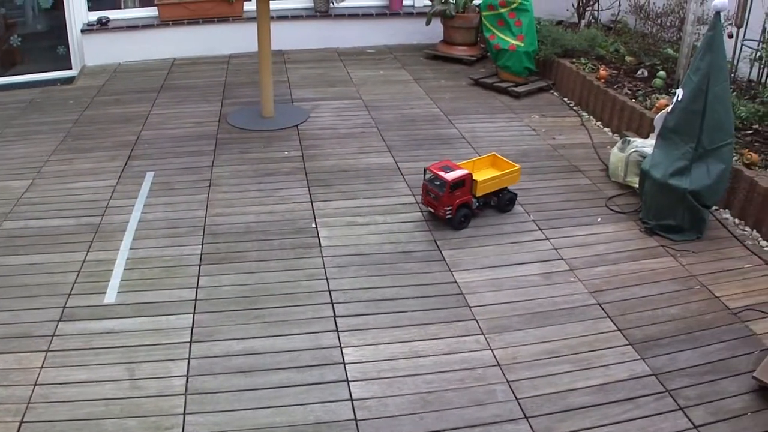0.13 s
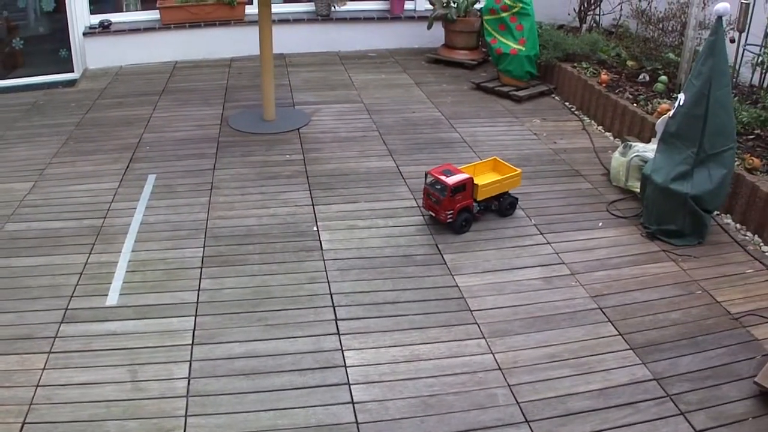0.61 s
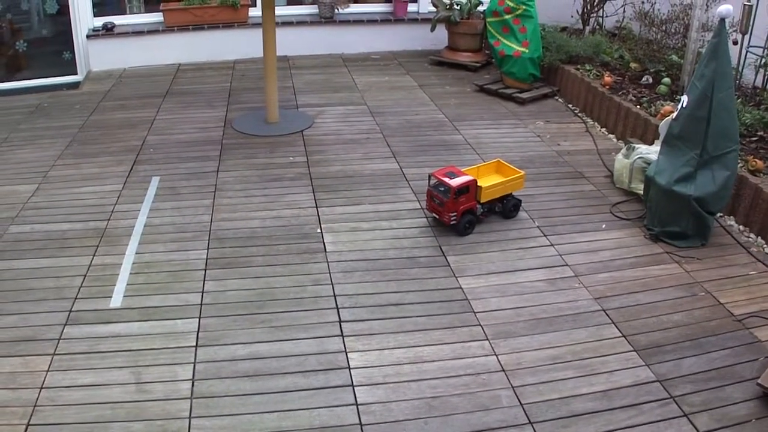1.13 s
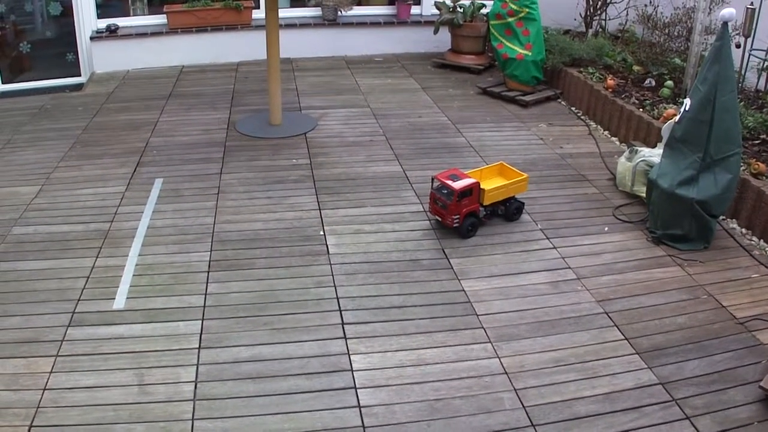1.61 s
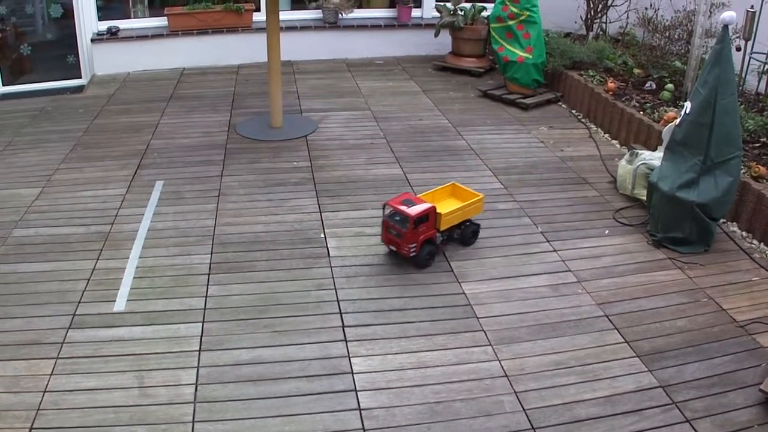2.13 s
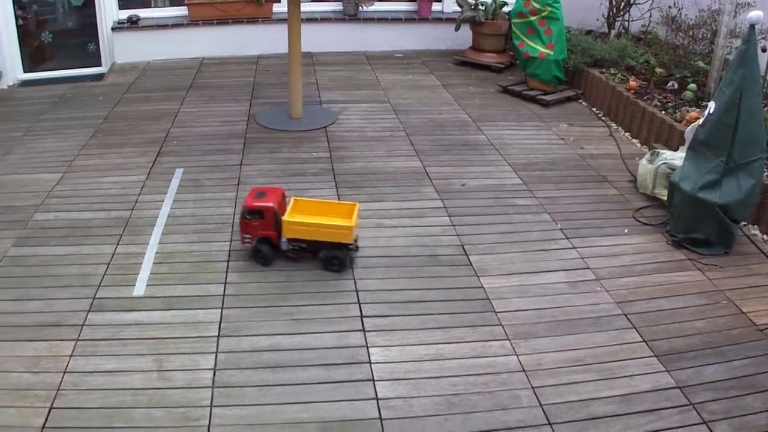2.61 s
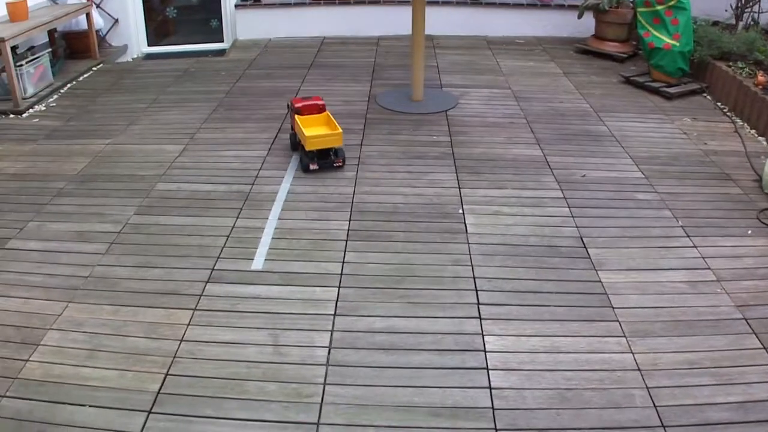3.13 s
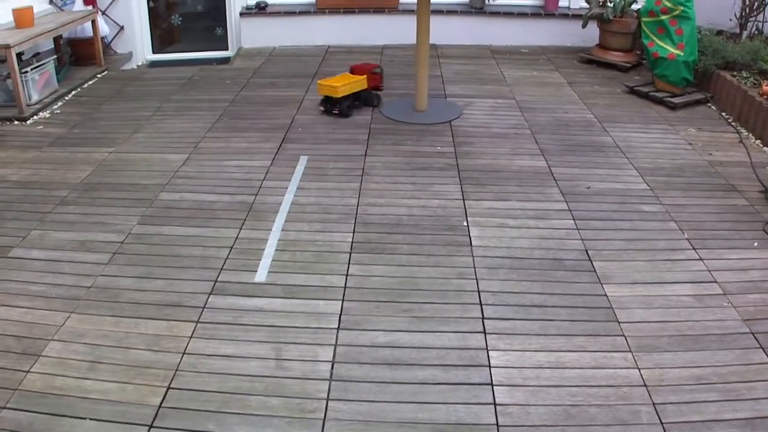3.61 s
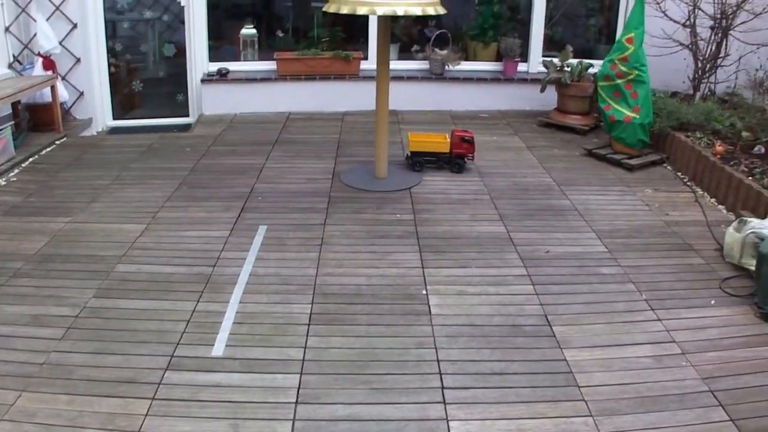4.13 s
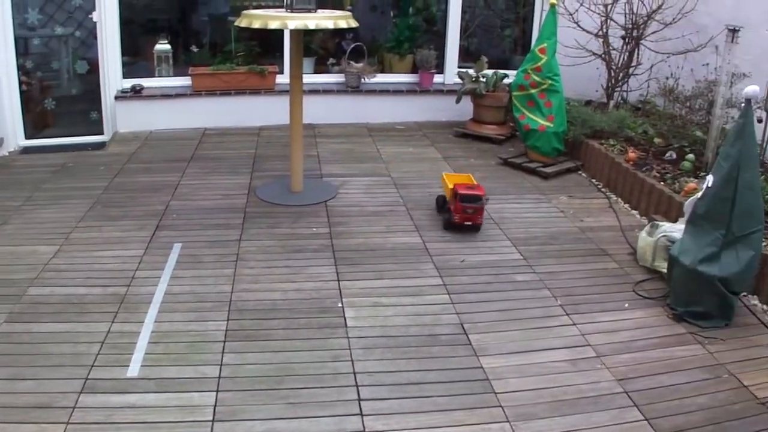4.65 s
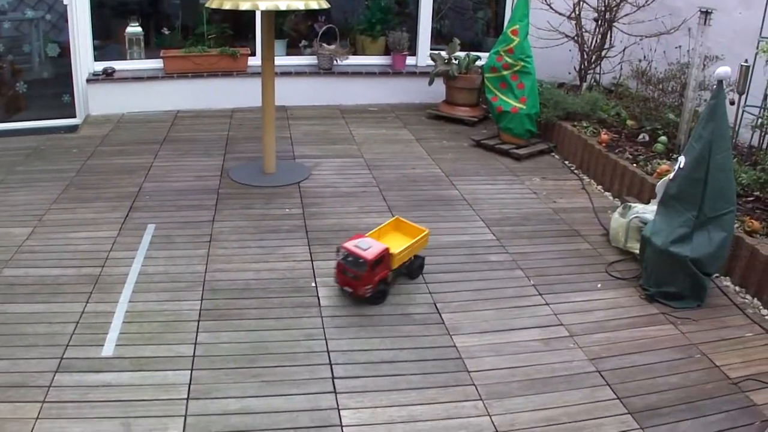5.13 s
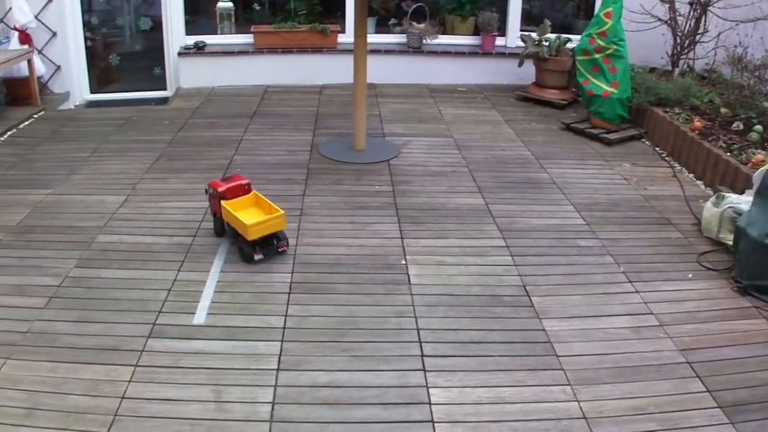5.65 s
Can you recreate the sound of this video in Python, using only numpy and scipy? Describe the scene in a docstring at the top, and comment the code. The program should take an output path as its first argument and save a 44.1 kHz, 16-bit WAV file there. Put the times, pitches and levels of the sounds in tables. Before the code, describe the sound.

Nearly two seconds of soft far hum and faint high whine, broken by a tiny plastic tick. A toy truck then drives over wooden tiles: uneven gear whirs surge and drop, wheels rattle and crackle, the hollow plastic body knocks. There is a brief lull around four seconds, then the strongest whine and clatter until the end. Outdoors between close walls, short reflections, heard through a small, coloured camera microphone.

```python
"""A town hums far off behind thin electronic tones; a toy truck stands on wooden deck tiles, its steering clicks.
Then it drives in bursts of throttle: gear whine is summed from smeared tones at the tooth rates,
grind and tyre hiss from dense tiny impacts, cracks from short noise bursts, knocks from decaying tones and noise.
Walls add a short echo, and a small camera colours everything, with deep notches in its treble."""
import sys
import numpy as np
from scipy import signal
from scipy.fft import rfft, irfft, next_fast_len
from scipy.io import wavfile
from scipy.ndimage import uniform_filter1d, map_coordinates

SR = 44100
rng = np.random.default_rng(int(sys.argv[2]) if len(sys.argv) > 2 else 0)


def elevation(decibels):
    """Turn decibel levels (scalar or array-like) into linear amplitude ratios."""
    levels = np.asarray(decibels, float)
    return 10 ** (levels / 20)


def unload_audio(sound):
    """Save the sound as a 16-bit wav file, at the path given as the first command line argument."""
    columns = np.transpose(np.atleast_2d(sound))
    # keep every value between -1 and 1, then stretch to whole-number steps
    steps = np.round(np.clip(columns, -1, 1) * 32767)
    wavfile.write(sys.argv[1], SR, steps.astype(np.int16))


N = 254016
START_S = 1.74  # the truck sets off
RELEASE_S = 0.035  # fade after a burst of throttle or a whine


def unit(x):
    """Scales a signal to an rms of one."""
    return x / np.sqrt(np.mean(x ** 2) + 1e-20)


def along(points, hz):
    """Interpolates (Hz, value) points on a log frequency axis."""
    f, v = np.transpose(points)
    return np.interp(np.log(hz + 1), np.log(f + 1), v)


def curves(rows):
    """One value per sample for each column after the time."""
    s, *cols = np.transpose(rows)
    return [np.interp(np.arange(N) / SR, s, c) for c in cols]


def wobble(rate):
    """A smooth random curve, rate knots a second."""
    knots = rng.standard_normal(int(N * rate / SR) + 4)
    return map_coordinates(knots, [np.arange(N) * rate / SR])


def filtered(x, response):
    """Multiplies the spectrum of x by a response of frequency."""
    n = x.shape[-1]
    m = 2 * next_fast_len(n // 2 + SR // 8)
    return irfft(rfft(x, m) * response(np.fft.rfftfreq(m, 1 / SR)), m)[..., :n]


def causal(gain):
    """The minimum-phase response with this gain: it rings after an impact, not before it."""
    cepstrum = irfft(np.log(gain + 1e-6))
    cepstrum[1:len(cepstrum) // 2] *= 2
    cepstrum[len(cepstrum) // 2 + 1:] = 0
    return np.exp(rfft(cepstrum))


# Colour of the tyre hiss and cracks. Each row: frequency in Hz, relative level in dB.
TYRE_SPECTRUM = [(1500, -57), (2800, -16.5), (4000, -15.5), (6000, -4.5), (9000, -6), (16000, -2.5)]
# Colour of the thin upper shell. Each row: frequency in Hz, relative level in dB.
SHELL_SPECTRUM = [(500, -27), (1500, 0), (2000, 5), (2400, -0.5), (2900, -5.5), (4500, -3), (7000, -23)]
# Colour of the rumbling deck. Each row: frequency in Hz, relative level in dB.
DECK_SPECTRUM = [(40, -63), (100, -45), (150, -12), (200, -4.5), (300, 9), (400, -5), (600, -25.5)]


def grind():
    """Uneven tooth and tread contacts shake the body and the deck; the tyres hiss in lumps."""
    def coloured(x, spectrum):
        return unit(filtered(x, lambda hz: causal(elevation(along(spectrum, hz)))))

    grind_db = effort()
    tyre_db, = curves(ROLLING)
    unevenness = 1.23 * wobble(45)  # in dB: random quick unevenness of the grind

    teeth = elevation(unevenness) * contacts(rate=4000, spread_db=2.0)
    shake = unit(patchy(filtered(teeth, body), depth_db=2.7, size=2))
    shell_hits = elevation(unevenness + 0.3 * wobble(30)) * contacts(rate=7600, spread_db=3.0)
    shell = coloured(shell_hits, SHELL_SPECTRUM)
    grit = elevation(0.79 * unevenness + 0.37 * wobble(74)) * contacts(rate=15000, spread_db=2.0)
    hiss = coloured(patchy(grit, depth_db=2.2, size=4), TYRE_SPECTRUM)
    deck = coloured(elevation(0.13 * unevenness) * rng.standard_normal(N), DECK_SPECTRUM)

    slow_db = uniform_filter1d(grind_db, SR // 5)  # the heavy deck responds slowly
    mix = driving(grind_db - 3.5) * shake
    mix += driving(grind_db - 14.0) * shell
    mix += driving(tyre_db + 9.5) * hiss
    mix += driving(0.73 * slow_db - 32.5) * deck
    return mix


# Rolling, louder with speed and nearness. Each row: time in seconds, relative level in dB.
ROLLING = [(1.72, -69), (1.82, -56.5), (1.96, -57), (2.14, -51), (2.22, -48), (2.36, -45), (2.6, -46.5),
           (2.84, -43), (3.14, -47), (3.55, -40.5), (3.72, -40.5), (3.9, -50), (4.36, -41.5), (4.74, -47),
           (5.1, -43.5), (5.25, -37.5), (5.76, -38.5)]
# Bursts of throttle. Each row: start in seconds, length before release in seconds, relative grind in dB.
THROTTLE_BURSTS = [(1.773, 0.077, -37), (2.127, .06, -40.5), (2.245, 0.034, -40), (2.33, 0.15, -32),
                   (2.611, .26, -29.5), (2.957, 0.12, -37.5), (3.108, 0.25, -31.5), (3.47, 0.25, -31),
                   (4.165, .13, -36), (4.309, 0.0533, -74), (4.398, 0.073, -29.5), (4.766, 0.32, -32.5),
                   (5.175, 0.25, -31.5), (5.34, 0.32, -31)]


def effort():
    """Relative grind level in dB: freewheeling, plus the power of each burst's attack, hold and release."""
    attack_s, coast_db = 0.038, 12  # coast_db: freewheeling grind over the rolling level
    t = np.arange(N) / SR
    roll_db, = curves(ROLLING)
    power = elevation(roll_db + coast_db) ** 2
    for start, length, db in THROTTLE_BURSTS:
        rise = (t - start) / attack_s
        fall = 1 + (start + length - t) / RELEASE_S
        power = power + (elevation(db) * np.clip(np.minimum(rise, fall), 0, 1)) ** 2
    return 10 * np.log10(power)


def driving(level_db):
    """Gain of a level curve, silent before the truck sets off."""
    return elevation(level_db) * np.clip((np.arange(N) / SR - START_S) / 0.03, 0, 1)


def contacts(rate, spread_db):
    """Dense tiny impacts of uneven size and random sign, about rate a second."""
    hit, size, sign = rng.random((3, N))
    impacts = (hit < rate / SR) * elevation(-spread_db * np.log(size + 1e-4))
    return unit(impacts * np.sign(sign - .5))


def patchy(x, depth_db, size):
    """Random gain in small patches of time and pitch: the sound is uneven and blotchy."""
    z = signal.stft(x, nperseg=512)[2]
    field = uniform_filter1d(rng.standard_normal(z.shape), size, 0)  # size in frequency bins
    field = uniform_filter1d(field, 4, 1)
    return signal.istft(z * elevation(depth_db * unit(field)), nperseg=512)[1][:N]


# Body resonances. Each row: centre in Hz, width in Hz, relative level in dB.
BODY_MODES = [(308, 57, -15.5), (624, 184, 0.5), (1130, 370, 0.5), (1460, 353, 3.5), (1736, 340, 2.5),
              (2435, 840, -7.5)]


def body(f):
    """Response of the plastic body: resonances of alternate sign, too small a shell to radiate bass."""
    modes = 0
    for k, (centre, width, db) in enumerate(BODY_MODES):
        damping = 1j * f * width
        modes = modes + (-1) ** k * elevation(db) * damping / (centre * centre - f * f + damping)
    return modes * (1j * f / (1j * f + 170)) ** 3


# Gear pairs sounding with the motor. Each row: ratio to the tooth rate, relative level in dB.
GEAR_PAIRS = [(1, 2), (0.81, -16.5), (1.4, -19), (1.9, -9.5), (2.02, -10.5)]
# The motor gears' glides, before sway. Each row: start in seconds, length before release in seconds,
# first tooth rate in Hz, last tooth rate in Hz, relative level in dB.
MOTOR_GLIDES = [(1.851, .35, 1460, 1410, -52.5), (2.12, 0.14, 685, 736, -49.5),
                (2.344, 0.13, 1060, 1032, -42.5), (2.627, 0.23, 1049, 1248, -35.5),
                (3.111, 0.21, 1010, 1260, -39.5), (3.461, 0.22, 1384, 1433, -35.5),
                (4.149, .22, 978, 1470, -43), (4.389, 0.086, 1340, 1510, -38),
                (4.802, 0.12, 959, 1199, -41.5), (4.921, .12, 1281, 1453, -34.5),
                (5.179, .13, 1357, 1760, -34.5), (5.384, 0.32, 1621, 1751, -37.5)]
# The output gear pair's own glides, before sway. Each row: start in seconds, length before release
# in seconds, first tooth rate in Hz, last tooth rate in Hz, relative level in dB.
OUTPUT_GLIDES = [(3.11, 0.22, 2060, 2540, -47.5), (4.2, 0.2, 1780, 2020, -40.5),
                 (4.83, .2, 2210, 2520, -42)]


def whine():
    """Under throttle the gears sing at their tooth rates; play in the teeth smears and sways the lines."""
    sway = 1 + .022 * wobble(45)
    motor = sum(sing(glide(*row), GEAR_PAIRS, sway, steady=1.0) for row in MOTOR_GLIDES)
    output = sum(sing(glide(*row), [(1, 0)], sway, steady=0.95) for row in OUTPUT_GLIDES)
    return motor + output


def glide(s, length, first_hz, last_hz, db):
    """(s, Hz, dB) corners of one whine: it fades in, glides and swells, and fades out."""
    swell_db, edge_db, spin_up_s = 1, 10.5, .04
    return [(s, first_hz, db - edge_db),
            (s + spin_up_s, first_hz, db - swell_db),
            (s + length, last_hz, db + swell_db),
            (s + length + RELEASE_S, last_hz, db - edge_db)]


def sing(rows, meshes, sway, steady):
    """One glide: each gear pair is a tone at its ratio of the tooth rate, smeared by random modulation."""
    hz, db = curves(rows)
    t = np.arange(N) / SR
    on = np.clip(np.minimum(t - rows[0][0], rows[-1][0] + 0.0057 - t) / 0.015, 0, 1)
    span = on > 0
    phase = 2 * np.pi * np.cumsum((hz * sway)[span]) / SR
    line = np.zeros(N)
    for ratio, mesh_db in meshes:
        knots = rng.standard_normal((2, 200))
        position = np.arange(len(phase)) * 190 * np.sqrt(ratio) / SR  # higher lines smear faster
        a, b = (map_coordinates(k, [position]) for k in knots)
        tone = (steady + a) * np.cos(ratio * phase) + b * np.sin(ratio * phase)
        line[span] += elevation(db[span] + mesh_db) * on[span] * tone
    return line


# Sharp ticks of the steering linkage and axles. Each row: time in seconds, strength in dB.
LINKAGE_TICKS = [(1.2045, -14), (1.239, -34), (1.2454, -33), (1.7643, -18), (2.34, -14), (2.8894, -12),
                 (2.9453, -12), (3.0745, -21), (3.38, -14), (3.468, -14), (4.143, -19), (4.934, -18),
                 (5.155, -18)]
# The body knocks as the drive takes up slack or a wheel drops. Each row: time in seconds,
# strength in dB, pitch in Hz, ringing share from 0 to 1.
BODY_KNOCKS = [(1.2048, -23, 1520, 0.32), (1.2057, -24.5, 322, 0.67), (1.79, -28.5, 1450, 0.3),
               (1.806, -27, 756, 0.62), (1.839, -28, 1620, 0.8), (2.105, -27, 580, 0.8),
               (2.156, -19, 716, 0.66), (2.34, -23, 1800, 0.66), (2.465, -19.5, 1065, 0.85),
               (2.659, -11.5, 1140, 0.5), (2.731, -12, 1130, 1), (2.905, -18, 873, 0.6),
               (2.981, -21, 1686, 1), (3.138, -21, 1050, 0.4), (3.169, -17.5, 1120, 0.97),
               (3.227, -14, 1260, 0.53), (3.475, -17, 1430, 0.9), (4.142, -24.5, 750, 0.25),
               (4.24, -19.5, 1820, 1), (4.349, -13, 2090, 0.7), (4.535, -18.5, 640, 0.32),
               (4.801, -21, 1400, 0.2), (4.982, -13, 1420, 0.6), (5.009, -8, 1400, 0.88),
               (5.031, -11, 1460, 0.98), (5.195, -13.5, 1350, 0.75), (5.218, -12.5, 1310, 0.9),
               (5.239, -8.5, 1654, 1), (5.259, -11.5, 1764, 0.88), (5.278, -11, 1813, 0.7),
               (5.32, -15, 1550, 0.9), (5.385, -13, 1095, 0.6), (5.453, -14, 1625, 0.56),
               (5.499, -9.5, 1146, 0.96), (5.554, -14, 1925, 1), (5.565, -12.5, 1640, 0.94),
               (5.694, -11, 1480, 0.9)]


def clicks():
    """Bright cracks that also shake the body, and duller knocks that ring briefly at their own pitch."""
    def burst(db, decay_s, rise_s):  # decay_s: time to fall 60 dB
        return elevation(db - 60 * t / decay_s) * (1 - np.exp(-t / rise_s))

    t = np.arange(SR // 8) / SR
    lumps, knock = np.zeros(N + SR), np.zeros(N + SR)
    for s, db in rattle():
        lumps[round(s * SR):][:len(t)] += burst(db + 12, 0.031, 0.003)
    for s, db in LINKAGE_TICKS:
        lumps[round(s * SR):][:len(t)] += burst(db, 0.011, 0.00035)
    for s, db, hz, share in BODY_KNOCKS:
        share = np.clip(share, 0, 1)
        thud = unit(filtered(rng.standard_normal(len(t)), body))
        jitter = np.cumsum(rng.normal(0, 0.02, len(t)))
        ring = np.sin(2 * np.pi * hz * t + jitter)
        knock[round(s * SR):][:len(t)] += burst(db, 0.039, 0.0026) * (share * ring + (1 - share) * thud)
    crack, shake = lumps[:N] * rng.standard_normal((2, N))
    crack = patchy(crack, depth_db=3.0, size=7)
    crack = filtered(crack, lambda hz: causal(elevation(along(TYRE_SPECTRUM, hz))))
    knock = filtered(knock[:N], lambda f: (1j * f / (1j * f + 140)) ** 4)  # trims the bass
    return crack + elevation(-2.0) * filtered(shake, body) + knock


# Single cracks, faint to loud, of tread, grit and plastic. Each row: time in seconds, relative level in dB.
SINGLE_CRACKS = [(1.8387, -34), (2.0308, -52), (2.1904, -29.5), (2.2398, -27), (2.2693, -27.5),
                 (2.355, -22), (2.37, -22.5), (2.5107, -23), (2.54, -33), (2.6554, -21.5), (2.7906, -31),
                 (2.806, -25), (2.818, -22), (2.846, -20), (2.855, -31), (2.8885, -32), (2.904, -28),
                 (2.9427, -27.5), (2.993, -30), (3.0385, -27.5), (3.0739, -38), (3.1099, -24.5),
                 (3.347, -27), (3.379, -41), (3.4012, -32), (3.4456, -44), (3.5284, -20.5), (3.6277, -20),
                 (3.6717, -22), (3.695, -21), (3.7458, -29), (3.833, -30), (3.906, -29.5), (4.0975, -27),
                 (4.4104, -22.5), (4.5341, -39)]
# Wheels crossing the slats square on, a steady rattle. Each row: start in seconds, end in seconds,
# gap between cracks in seconds.
SLAT_RUNS = [(3.233, 3.32, .0262), (4.958, 5.115, .0249), (5.219, 5.35, .0202), (5.363, 5.7, .022)]


def rattle():
    """(s, relative dB) of every crack: the single ones, the evenly spaced slat runs and random grit."""
    slat_db, slat_spread_db = 17.5, 1.5  # over the rolling level
    grit_per_s, grit_db, grit_spread_db = 40, 10, 5  # over the rolling level, spread either way
    rows = list(SINGLE_CRACKS)
    for start, end, gap in SLAT_RUNS:
        times = start + gap * np.arange(20)
        db = np.interp(start, *np.transpose(ROLLING)) + slat_db
        levels = db + slat_spread_db * rng.standard_normal(20)
        rows += [beat for beat in zip(times, levels) if beat[0] < end]
    wait, size = rng.random((2, 300))
    when = START_S - np.cumsum(np.log(1 - wait)) / grit_per_s
    level = np.interp(when, *np.transpose(ROLLING)) + grit_db + grit_spread_db * (2 * size - 1)
    return rows + [row for row in zip(when, level) if row[0] < N / SR]


# Decay of the echo. Each row: frequency in Hz, time to fall 60 dB in seconds.
ECHO_DECAY = [(200, 0.2), (2000, 0.3), (10000, 0.3)]


def patio(x):
    """Walls answer with a decaying stereo noise tail; each frequency dies at its own speed."""
    hz, t, z = signal.stft(rng.standard_normal((2, SR // 3)), SR, nperseg=256)
    decay = elevation(-60 * t / along(ECHO_DECAY, hz)[:, None])
    tail = signal.istft(z * decay, SR, nperseg=256)[1]
    late = np.pad(x, (300, 0))[None]  # 300 samples, about 7 ms
    return signal.fftconvolve(late, tail / np.linalg.norm(tail[0]), axes=1)[:, :N]


# Colour of the far town. Each row: frequency in Hz, relative level in dB.
TOWN_SPECTRUM = [(25, -42), (60, -18.5), (100, -15.5), (200, -5), (280, 1.5), (450, -2), (750, 0.5),
                 (1200, -2.5), (2000, -8), (2700, -19), (4000, -23), (7000, -15.5), (10000, -17.5),
                 (16000, -14)]
# Likeness of the hum at left and right. Each row: frequency in Hz, correlation from -1 to 1.
TOWN_LIKENESS = [(60, 0.37), (150, 0.38), (380, 0.27), (950, 0.6), (2380, 0.18), (5980, -0.29),
                 (15000, 0.24)]


def town():
    """Far hum of coloured noise, partly shared by both channels, swelling a little."""
    def mid_side(hz):
        angle = np.arccos(np.clip(along(TOWN_LIKENESS, hz), -1, 1)) / 2
        return elevation(along(TOWN_SPECTRUM, hz)) * [np.cos(angle), np.sin(angle)]

    mid, side = filtered(rng.standard_normal((2, N)), mid_side)
    level_db = -47 + 0.4 * wobble(2.16) + [[.7], [-.7]]  # left, right
    return elevation(level_db) * unit(np.array([mid + side, mid - side]))


# Thin electronic tones of steady pitch. Each row: frequency in Hz, mean level in dB.
STEADY_TONES = [(7800, -65.5), (7825, -79), (9000, -78), (15625, -58)]
# A faint gliding whistle. Each row: time in seconds, frequency in Hz, mean level in dB.
GLIDING_WHISTLE = [(1.3, 8300, -95), (1.36, 9400, -71), (1.43, 10300, -64), (1.5, 9800, -72),
                   (1.55, 9700, -88), (1.63, 9850, -74), (2.05, 10200, -72), (2.15, 10000, -95)]
# Colour of the camera's own hiss. Each row: frequency in Hz, relative level in dB.
CIRCUIT_SPECTRUM = [(10000, -60), (13500, -12), (14000, -4), (15000, 3), (15700, -7)]


def tones():
    """Thin sines of steady pitch, the faint whistle and the circuit hiss, all wavering in level."""
    t = np.arange(N) / SR
    steady = sum(elevation(db + 1.1 * wobble(6)) * np.sin(2 * np.pi * hz * t) for hz, db in STEADY_TONES)
    hz, db = curves(GLIDING_WHISTLE)
    whistle = elevation(db + 2.1 * wobble(29.6)) * np.sin(2 * np.pi * np.cumsum(hz) / SR)
    noise = elevation(2.5 * wobble(25)) * rng.standard_normal((2, N))
    hiss = filtered(noise, lambda f: elevation(along(CIRCUIT_SPECTRUM, f)))
    return steady + whistle + elevation(-45) * unit(hiss)


# The truck's lean. Each row: frequency in Hz, left minus right in dB.
LEFT_LEAN = [(60, -3), (200, 1.8), (550, 2), (1300, 3), (2500, 2), (5000, 2), (9000, 5), (14000, 3.5)]


def scene():
    """The truck with its echo, leaning left over most of the range, over the hum and tones."""
    truck = grind() + whine() + clicks()
    echo_colour = [(1000, -13.5), (4000, -10), (9000, -2.5)]  # Hz, dB
    echo = patio(filtered(truck, lambda hz: elevation(along(echo_colour, hz))))
    leaning = filtered(truck + echo, lambda hz: elevation(along(LEFT_LEAN, hz) * [[.5], [-.5]]))
    return leaning + town() + tones()


def low_pass(x):
    """Removes everything above the highest recorded frequency."""
    return signal.sosfilt(signal.butter(12, 17010, fs=SR, output="sos"), x)


# Colour of the small camera. Each row: frequency in Hz, gain in dB.
CAMERA_COLOUR = [(0, 0), (2500, 0), (2850, -9), (3400, -8.5), (4700, -11.5), (5300, -6.5), (5900, -5),
                 (9500, -10.5), (10800, -20.5), (11400, -30.5), (11750, -51), (13740, -74), (13950, -34),
                 (14500, -39), (15600, -24.5), (15800, -86)]
# Deep notches in its treble. Each row: centre in Hz, width in Hz, steepness as an exponent.
CAMERA_NOTCHES = [(3000, 194, 1.22), (4005, 139, 2.3), (5042, 131, 2.66)]


def record(dry):
    """The camera's uneven response and deep notches filter the whole scene."""
    def colour(f):
        gain = elevation(np.interp(f, *np.transpose(CAMERA_COLOUR)))
        for centre, width, steepness in CAMERA_NOTCHES:
            offset = (f - centre) ** 2
            gain = gain * (offset / (offset + width * width)) ** (steepness / 2)
        return causal(gain)

    mix = filtered(dry, colour)
    return low_pass(mix)


dry = scene()
out = record(dry)
unload_audio(out)
```